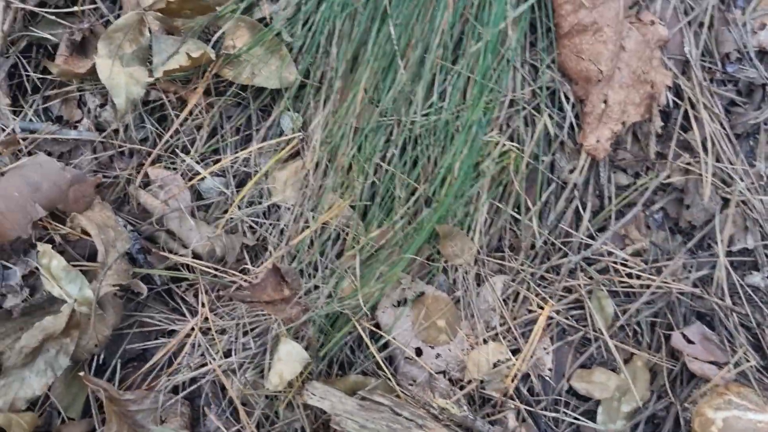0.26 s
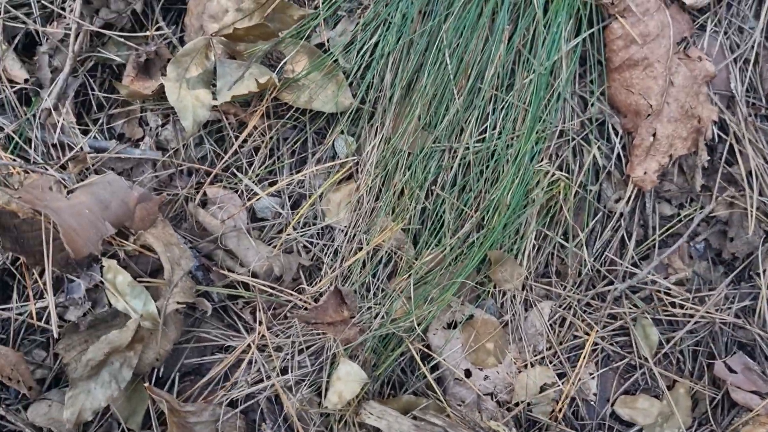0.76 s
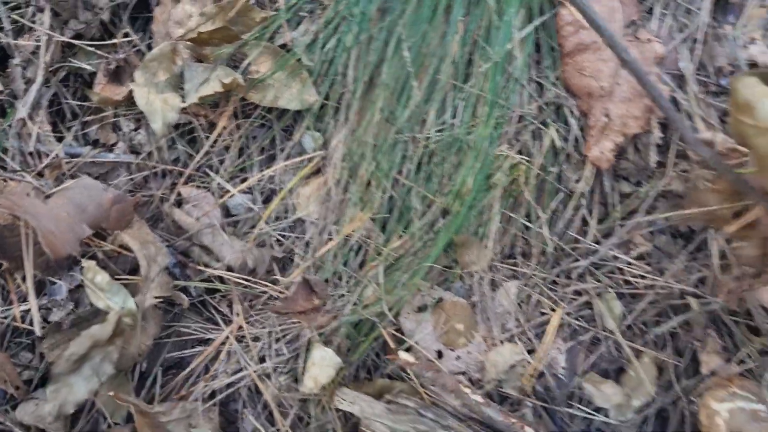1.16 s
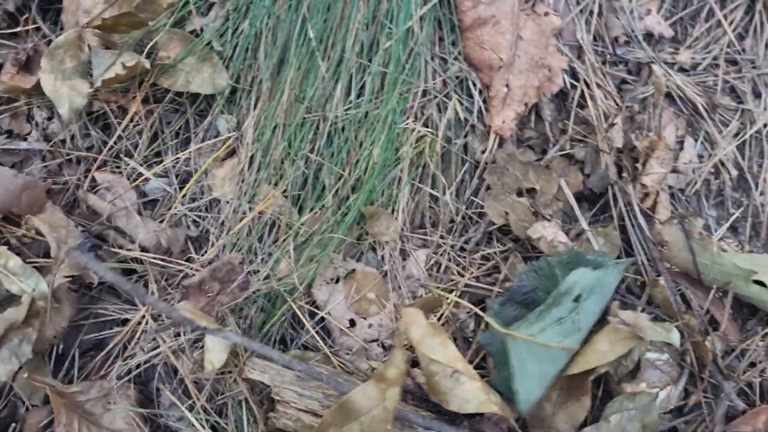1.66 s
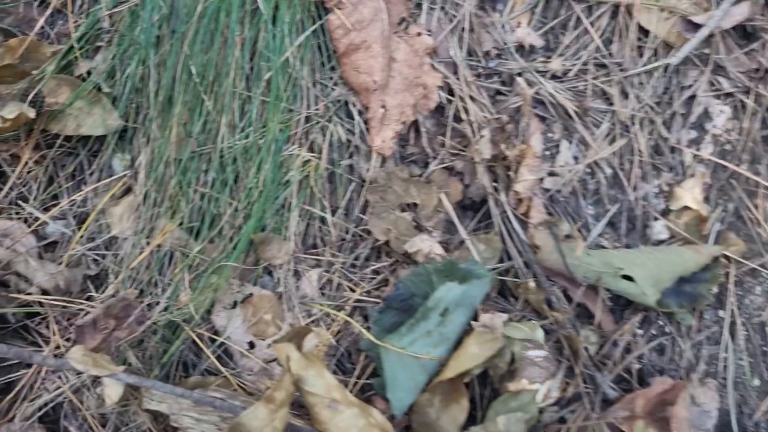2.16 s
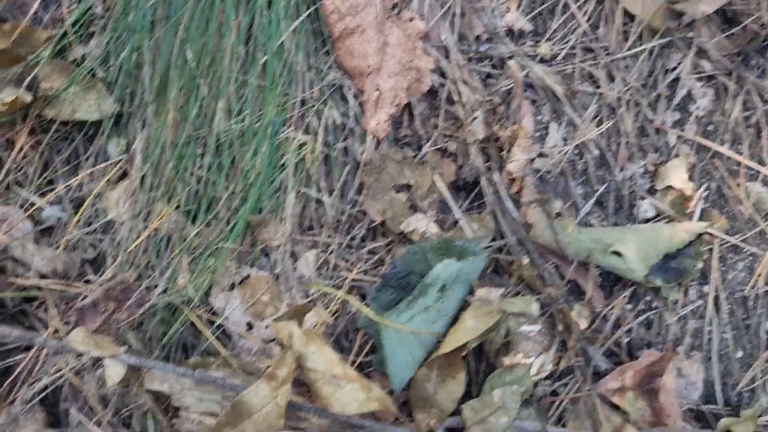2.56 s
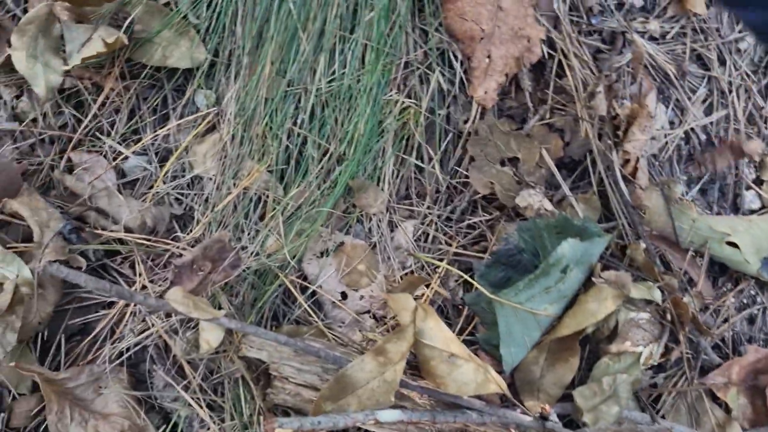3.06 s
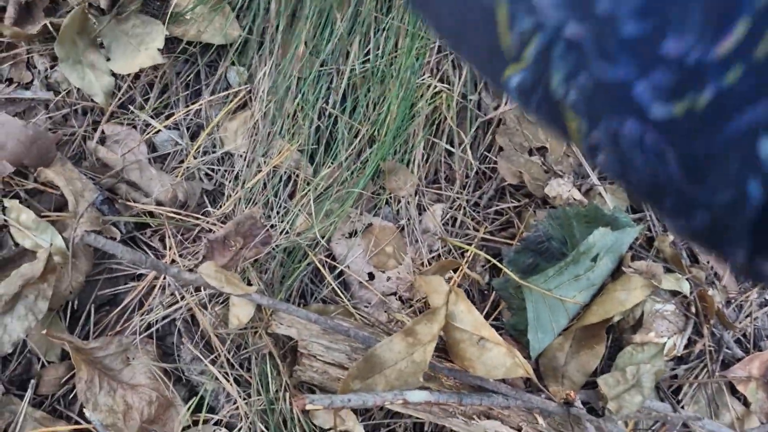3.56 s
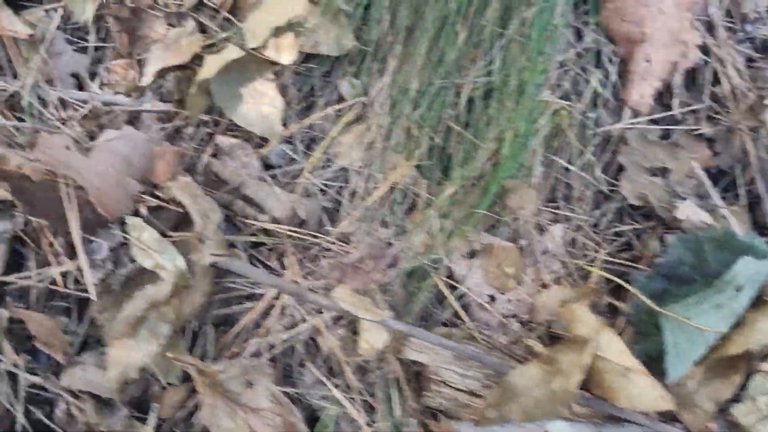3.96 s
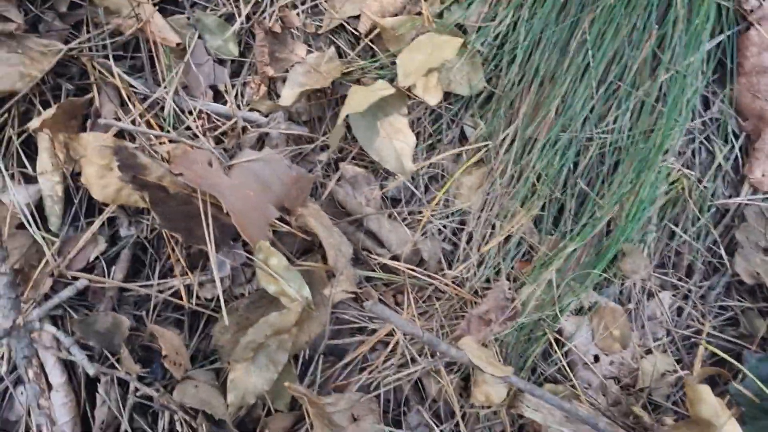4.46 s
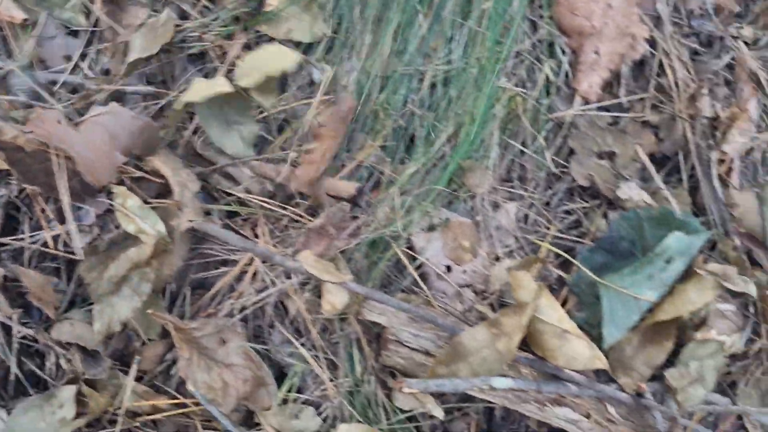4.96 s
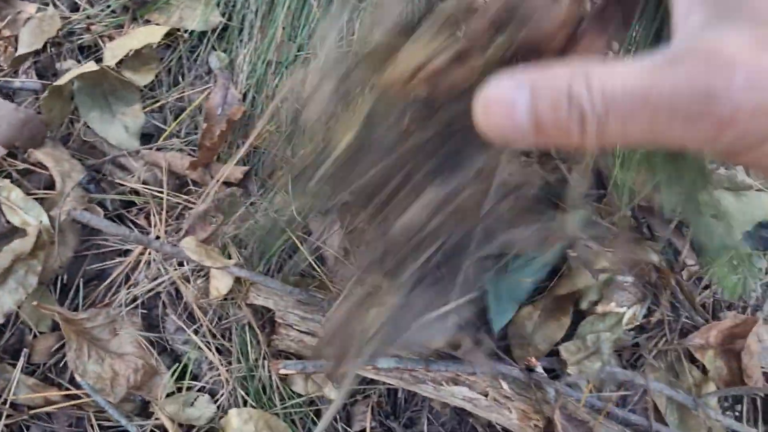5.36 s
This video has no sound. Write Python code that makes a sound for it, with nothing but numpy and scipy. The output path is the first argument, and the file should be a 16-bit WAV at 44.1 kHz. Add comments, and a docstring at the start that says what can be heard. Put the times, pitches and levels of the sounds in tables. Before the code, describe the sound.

Close, wide stereo sound from a forest floor, dry and without reverberation. From 0 to 0.7 s a hand rustles crisp leaves and pine needles in short strokes, with bright tiny snaps around 0.2-0.4 s. The strongest grab comes at 0.93-0.96 s: a dense burst of sharp cracks with a dull soft pat on soil. Weaker rustles follow near 1.1 and 1.5 s, then it is mostly quiet until about 2.3 s, with sparse ticks. From 2.6 to 4 s fuller papery rustling swells and overlaps, with snaps at 2.8 and 3.2 s and a dull woolly sleeve brush around 3.2 and 4 s. Another scuff and crumple comes at 4.3 s, a tick and low thump on the recorder at 4.5 s, fainter bumps near 4.85 s, then light crackles to 5.6 s. Underneath: soft airy rumble, thin steady insect buzz around 8 kHz, and a faint far engine drone fading away.

```python
"""A hand rakes and lifts dry leaves and pine needles on a forest floor, close to a stereo microphone.
The litter crackles in random clicks and band-filtered noise; needles and stalks snap as short ringing bursts.
A sleeve brushes by as dull filtered noise, and the recorder is bumped with ticks and low thumps.
Insects buzz as fluttering bands of noise, far off an engine drones in sine waves and fades,
and noise shaped band by band makes the soft air of the forest."""
import sys
import numpy as np
from scipy import signal
from scipy.io import wavfile
from scipy.ndimage import map_coordinates

SR = 44100
rng = np.random.default_rng(int(sys.argv[2]) if len(sys.argv) > 2 else 0)


def wav_record(signal):
    """Record a signal, one row per channel, as 16-bit PCM in the file named by sys.argv[1]."""
    frames = np.transpose(np.atleast_2d(signal))
    bounded = np.clip(frames, -1, 1)
    # unit amplitude maps onto the largest positive 16-bit level
    quanta = np.round(bounded * 32767).astype(np.int16)
    wavfile.write(sys.argv[1], SR, quanta)


N = 247834  # length [samples]

# forest air: (frequency [Hz], relative level per Hz [dB])
AIR_COLOUR = [(25, -14), (45, -22), (70, 12.5), (110, -6.5), (170, -11), (260, -7), (400, -5), (700, -3),
              (1200, -6), (2000, -15.5), (4000, -21.5), (7000, -29), (11000, -14), (16000, -26)]
# likeness of forest air at the two ports: (frequency [Hz], likeness [-1 to 1])
AIR_LIKENESS = [(60, 0.61), (130, 1), (300, 0.13), (700, -0.71), (1400, -0.83), (4000, 0.045)]
# far engine: (time [s], cycle rate [Hz], level [dB])
ENGINE_COURSE = [(0, 13.7, -56), (1.1, 15.2, -56), (1.9, 14.5, -56), (2.4, 13.8, -57), (3.5, 12, -58.5),
                 (5, 13, -60.5), (5.62, 18, -88)]
# tones of the engine: (multiple of the cycle rate [-], relative level [dB])
ENGINE_ORDERS = [(4, -1.5), (6, -6), (10, -10), (12, -30)]
# steady far drone: (time [s], frequency [Hz], level [dB])
DRONE_COURSE = [(0, 72, -55), (.6, 74, -56), (2.4, 72, -57), (3, 74, -60.5), (3.9, 75.5, -58),
                (4.8, 73, -65), (5.62, 75, -64)]
# insect chorus: (centre [Hz], width [Hz], level [dB])
INSECT_BANDS = [(7550, 1100, -53), (8160, 370, -52.5), (8760, 300, -53.5)]
# knocks on the recorder's case: (time [s], tick level before trim [dB], thump level before trim [dB])
CASE_BUMPS = [(4.5144, -25.5, -29.5), (4.835, -39, -58), (4.895, -52, -39)]
# a knitted sleeve brushes past: (time [s], hold [s], level [dB], rise [s], fall [s], centre [Hz])
SLEEVE_BRUSHES = [(3.25, 0.18, -48.5, .5, 0.35, 857), (3.95, 0.13, -49.5, 0.17, .1, 756),
                  (4.26, 0.057, -45, 0.21, 0.12, 595), (4.9, 0.066, -53.5, 0.15, 0.31, 570)]
# where the hand works: (time [s], lag of the left port [ms])
HAND_PLACE = [(0, 0.51), (.95, 0.46), (1.2, .27), (2.6, 0.31), (3.9, -.12), (5.3, 0.41), (5.62, 0.039)]
# strokes of the hand through the litter: (time [s], hold [s], relative crackle level [dB], rise [s],
# fall [s], crisp treble lift [dB], hollow low lift [dB], ring of pressed leaves [Hz], left over right [dB])
HAND_STROKES = [(0.05, 0.28, -41.5, 0.12, 0.0054, 2, 2.5, 3020, 0),
                (0.2, 0.088, -34.5, 0.032, 0.0081, 2, 3, 3370, 0.5),
                (0.47, 0.24, -44.5, 0.1, 0.054, 1.5, -1, 5060, -4),
                (0.615, 0.015, -32.5, 0.012, 0.017, 9.5, 3, 5000, 1.5),
                (0.84, 0.1, -41.5, 0.048, .02, 0, 1.5, 3780, -5),
                (0.929, .037, -25.5, 0.0029, 0.013, 2, -3.5, 4800, -4.5),
                (0.98, .03, -37.5, .01, 0.11, 7.5, 3.5, 4450, 0),
                (1.09, 0.057, -45.5, 0.04, 0.053, -4, 15, 5030, 0),
                (1.42, 0.0092, -42.5, 0.04, 0.034, 4, -5, 3500, -4.5),
                (1.505, 0.049, -37.5, 0.021, 0.07, -1, 0, 3300, -3),
                (1.795, .01, -51, 0.041, .025, 3.5, -14, 3300, -1),
                (2.335, .08, -47, 0.043, 0.077, 5.5, -8, 2940, -2.5),
                (2.64, 0.27, -40.5, 0.049, 0.044, 7, -5.5, 3600, -4),
                (2.94, 0.26, -39.5, .02, 0.054, 0, -3, 3386, -2.5),
                (3.22, 0.11, -36.5, .02, 0.095, -1.5, -1, 3480, -2.5),
                (3.4, 0.11, -34, 0.2, 0.068, 1.5, 3.5, 3840, -3),
                (3.68, 0.093, -36, 0.16, 0.092, 2, 2, 6400, -1),
                (3.885, 0.088, -32, 0.067, 0.17, 1, 3, 6930, 0.5),
                (4.31, 0.24, -37, 0.053, 0.074, -3, 0.5, 2980, -3),
                (4.675, 0.01, -36.5, 0.017, 0.045, 0, -2, 4540, -1.5),
                (4.78, 0.14, -46.5, 0.069, 0.065, -2.5, 3.5, 3800, -2),
                (4.97, 0.19, -42.5, 0.075, 0.14, 4, -3.5, 3870, -3.5),
                (5.4, 0.066, -40.5, 0.059, 0.036, 1.5, -6, 3300, -4.5),
                (5.512, 0.047, -34.5, 0.02, 0.071, 4.5, 1, 3970, -2.5)]
# colour of the dry litter: (frequency [Hz], relative level per Hz [dB])
LITTER_COLOUR = [(250, -11), (500, -19), (750, -9.5), (1050, -2.5), (1600, -8), (2200, -3.5), (3200, -2),
                 (6000, -1), (7300, -4), (9000, -0.5), (11000, -2), (12600, 0.5), (14500, -0.5),
                 (16000, -6)]
# likeness of the two ports for sound scattered by the ground: (frequency [Hz], likeness [-1 to 1])
SCATTER_LIKENESS = [(250, 0.97), (700, -0.036), (1400, -0.57), (3000, -0.38), (7000, 0.15), (16000, -0.047)]
# loud snaps of needles and stalks: (time [s], level [dB], ring [Hz], left over right [dB], decay [s])
LOUD_SNAPS = [(0.1907, -25, 14500, -13, 0.0018), (0.2609, -20.5, 12800, 5, 0.0026),
              (0.307, -21.5, 13900, 0, 0.0036), (0.381, -33, 2800, -3, 0.0019),
              (0.627, -30, 10900, 10, .002), (0.8156, -34, 12600, 3, .002),
              (0.8308, -30.5, 12900, -2, .0018), (0.8605, -26, 14600, -12, 0.0057),
              (0.927, -22, 4080, -13, 0.0023), (0.948, -15.5, 13000, -7, 0.0023),
              (0.9605, -17, 13000, -13, .002), (1.0954, -31, 2000, -7, 0.0026),
              (1.1323, -29.5, 12600, 8, 0.0082), (1.2197, -29.5, 9700, 3, 0.006),
              (1.2803, -38, 5150, -4, .0022), (1.5008, -34, 4340, 6, .0015), (1.6673, -37, 8600, 2, .0018),
              (1.973, -49, 4570, 0, 0.0024), (2.2976, -33, 8550, -7, .0018),
              (2.334, -37, 11800, -10, 0.0018), (2.3455, -26.5, 10100, -5, .0025),
              (2.402, -35.5, 3100, -12, .003), (2.4597, -31.5, 8300, -9, 0.0013),
              (2.4813, -32, 13320, -10, 0.0013), (2.8341, -24.5, 12400, -6, 0.002),
              (2.946, -25.5, 4460, -10, .003), (3.198, -21, 11900, 0, 0.0047),
              (4.3007, -30.5, 12500, 2, .0023), (4.344, -32, 7700, -14, 0.0014),
              (4.3808, -29.5, 2220, -4, 0.0022), (4.872, -36.5, 3420, 0, 0.0098),
              (4.9184, -36, 3800, -2, 0.0013), (4.966, -35, 4760, -2, 0.0076),
              (5.2631, -31, 11400, -6, .002), (5.3405, -30.5, 8500, -2, .0015),
              (5.4004, -27.5, 11800, -15, .0022), (5.432, -32, 3400, 6, 0.0023)]
# near reflections from the hand and the ground: (middle delay [ms], relative level [dB])
NEAR_ECHOES = [(1.5, -14.5), (3.6, -15.5), (7.0, -13.5)]
# papery body of the leaf pile: (centre [Hz], width [Hz], lift [dB])
PILE_BODY = [(976, 240, 3), (1656, 270, 6.5), (12800, 630, 2.5)]
# dips where the recorder's case shades the left port: (centre [Hz], width [Hz], change [dB])
LEFT_SHADE = [(1315, 110, -23.5), (2330, 440, -10.5)]
# dips where the case shades the right port: (centre [Hz], width [Hz], change [dB])
RIGHT_SHADE = [(1250, 920, -4), (2100, 230, -3.5)]

SCATTER_S, SNAP_TAIL_S = .003, .011
# every movement leaves a weaker, slower settling, above a floor that never falls quite still
SETTLE_DB, SETTLE_S, STILL_DB = -15.5, 0.15, -68.5
CUTOFF_HZ = 15950


def from_db(db):
    """Turn decibels into gain."""
    return 10 ** (np.asarray(db) / 20)


def rms_one(x):
    """Scale to an rms (average strength) of 1."""
    return x / np.sqrt(np.mean(x ** 2) + 1e-20)


def in_time(rows):
    """Read each column of a timed table at every sample."""
    s, *columns = np.transpose(rows)
    return [np.interp(np.arange(N) / SR, s, column) for column in columns]


def at_hz(points, hz):
    """Read a curve between its points on a log-frequency axis."""
    f, value = np.transpose(points)
    return np.interp(np.log(hz), np.log(f), value)


def band(x, low, high, order=2):
    """Keep the sound between two frequencies with a Butterworth filter."""
    sos = signal.butter(order, [low, min(high, .47 * SR)], "band", fs=SR, output="sos")
    return signal.sosfilt(sos, x + 1e-18)


def drift(rate):
    """Wander in straight lines between random values (spread 1) drawn rate times a second."""
    knots = rng.standard_normal(4000)
    return np.interp(np.arange(N) / SR * rate, np.arange(len(knots)), knots)


def two_ports(pair, likeness):
    """Mix two unrelated signals into a left and right that are alike by a given amount."""
    c = np.clip(likeness, -.98, .98)
    shared = np.sqrt(1 + c) * pair[0]
    opposed = np.sqrt(1 - c) * pair[1] * np.array([[1], [-1]])
    return (shared + opposed) / np.sqrt(2)


def panned(pan_db):
    """Left and right gains at constant power; a positive setting favours the left."""
    gains = from_db(np.array([pan_db, -pan_db]).reshape(2, -1) / 2)
    return gains / np.sqrt(np.mean(gains ** 2, axis=0))


def add(out, s, sound):
    """Mix a short sound in at a time in seconds."""
    i = int(s * SR)
    out[:, i:i + sound.shape[-1]] += sound[..., :max(N - i, 0)]


def delayed(x, ms):
    """Read a signal late by a delay that may move."""
    return map_coordinates(x, [np.arange(N) - ms * SR / 1000], order=3)


def resonance(x, hz, width, size=256):
    """Ring at a pitch that may move: a two-pole resonator with a peak gain near 1."""
    hz, r = np.broadcast_to(hz, N), np.exp(-np.pi * width / SR)
    out, state = np.zeros_like(x), np.zeros((2, 2))
    # the pitch is renewed once per block of samples
    for i in range(0, N, size):
        poles = [1, -2 * r * np.cos(2 * np.pi * hz[i] / SR), r * r]
        out[:, i:i + size], state = signal.lfilter([1, 0, -1], poles, x[:, i:i + size], zi=state)
    return out * (1 - r * r) / 2


def coloured(x, peaks):
    """Lift or dip bands by adding or taking away a filtered copy."""
    for hz, width, db in peaks:
        filtered = signal.lfilter(*signal.iirpeak(hz, hz / width, fs=SR), x)
        x = x + (from_db(db) - 1) * filtered
    return x


def movements(rows):
    """Swell, hold, fade and settle each movement; give the total level [dB] and power-weighted qualities."""
    t, power, blend = np.arange(0, N, 32) / SR, 1e-20, 0
    for s, hold_s, db, rise_s, fall_s, *qualities in rows:
        before, after = np.maximum(s - t, 0), np.maximum(t - s - hold_s, 0)
        settling = from_db(SETTLE_DB) * np.exp(-after / SETTLE_S)
        release = np.maximum(np.exp(-after / fall_s), settling)
        own = (from_db(db) * np.exp(-before / rise_s) * release) ** 2
        power, blend = power + own, blend + np.outer(qualities, own)
    level_db = 10 * np.log10(power + from_db(STILL_DB) ** 2)
    return in_time(np.column_stack([t, level_db, *(blend / power)]))


def air(level_db=-53.0, patchy_db=3.0):
    """The soft rumble and hush of the open forest: noise bands that wander in level."""
    out, white = 0, rng.standard_normal((2, 2, N))
    edges = np.geomspace(22, 17000, 18)
    for k, (low, high) in enumerate(zip(edges, edges[1:])):
        hz = np.sqrt(low * high)
        gain = from_db(at_hz(AIR_COLOUR, hz) + patchy_db * drift(7.5))
        out = out + gain * two_ports(band(white[k % 2], low, high), at_hz(AIR_LIKENESS, hz))
    return from_db(level_db) * rms_one(out)


def engine(waver_db=2.5, low_cut_hz=47, rumble_db=-3.5):
    """Only rumble and multiples of a far engine's cycle rate carry through the trees, beside a drone."""
    rate, level_db = in_time(ENGINE_COURSE)
    turn = 2 * np.pi * np.cumsum(rate) / SR
    orders = 0
    for multiple, db in ENGINE_ORDERS:
        tone = np.sin(round(multiple) * turn + rng.uniform(0, 2 * np.pi))
        orders = orders + from_db(db + waver_db * drift(5.16)) * tone
    rumble_noise = band(two_ports(rng.standard_normal((2, N)), 0.58), 100, 274)
    rumble = from_db(rumble_db) * rms_one(rumble_noise)
    hz, drone_db = in_time(DRONE_COURSE)
    drone = from_db(drone_db + waver_db * drift(5.8)) * np.sin(2 * np.pi * np.cumsum(hz) / SR)
    tones = band(from_db(level_db) * orders + drone, low_cut_hz, 550, order=4)
    # the root of 2 brings a sine wave to an rms of 1
    return np.sqrt(2) * tones + from_db(level_db) * rumble


def insects(pulse_hz=100, flutter_db=2.8, level_db=0.0):
    """Insects high in the trees merge into a buzz: overlapping noise bands with a fast random flutter."""
    out = 0
    for hz, width, db in INSECT_BANDS:
        rasp = rng.standard_normal((2, N)) * from_db(flutter_db * drift(pulse_hz))
        voice = band(rasp, hz - width / 2, hz + width / 2, order=1)
        out = out + from_db(db + level_db) * rms_one(band(voice, 7200, 10200))
    return out


def bumps(thump_hz=64, swell_s=0.023, tick_s=0.0016, tick_top_hz=3200, pan_db=-7):
    """A finger ticks on the case, which then wobbles in the grip: a noise burst and a swelling sine."""
    out, t = np.zeros((2, N)), np.arange(SR // 3) / SR
    swell = (t / swell_s) ** 2 * np.exp(2 - 2 * t / swell_s)
    wobble = swell * np.sin(2 * np.pi * thump_hz * t)
    for s, tick_db, thump_db in CASE_BUMPS:
        tick = band(rng.standard_normal(len(t)) * np.exp(-t / tick_s), 210, tick_top_hz)
        tick = from_db(tick_db + 7) * tick / np.abs(tick).max()
        add(out, s, panned(pan_db) * (tick + from_db(thump_db - 4) * wobble))
    return out


def sleeve(width_hz=420, lumpy_db=1.0, likeness=0.21):
    """Wool catches and slides in dull, lumpy scuffs: noise through two resonators in a row."""
    db, hz = movements(SLEEVE_BRUSHES)
    rub = two_ports(rng.standard_normal((2, N)), likeness) * from_db(lumpy_db * drift(60))
    scuff = resonance(resonance(rub, hz, width_hz), hz, width_hz)
    return from_db(db) * rms_one(scuff)


def pat(s=.94, swell_s=0.032, level_db=-49, low_hz=110, high_hz=420):
    """The hardest grab presses through the leaves onto soft soil: a dull puff of low noise."""
    age = np.maximum(np.arange(N) / SR - s, 0) / swell_s
    puff = rms_one(band(two_ports(rng.standard_normal((2, N)), 0.61), low_hz, high_hz))
    return from_db(level_db) * age * np.exp(1 - age) * puff


def reflected(x, sway=0.0722, level_db=-0.69):
    """Short echoes comb the sound, differently at each port, and shift as the hand moves."""
    out = x.copy()
    for port in range(2):
        for ms, db in NEAR_ECHOES:
            out[port] += from_db(db) * delayed(x[port], ms * (1 + sway * drift(4)))
    return from_db(level_db) * out


def small_snaps(force_db, count=70, over_db=0.0, spread_db=7.0, strongest_db=-28,
                low_hz=3500, high_hz=14000, pan_db=-4, decay_s=0.0021):
    """List random breaks of thin needles, louder under more force, up to what a needle can bear."""
    rows = []
    for when, size, pitch in rng.random((count, 3)):
        db = force_db[int(when * N)] + over_db + spread_db * (2 * size - 1)
        hz = low_hz * (high_hz / low_hz) ** pitch
        rows.append((when * N / SR, min(db, strongest_db), hz, pan_db, decay_s))
    return rows


def snaps(rows, tail_db=-18, ring_db=0.0, ring_width=0.15, likeness=0.088, level_db=0.0, crack_low_hz=2000):
    """A snap is a broad crack, the ring of the broken piece and a short tail from the leaves around it."""
    out, t = np.zeros((2, N)), np.arange(SR // 16) / SR
    for s, db, hz, pan_db, decay_s in rows:
        decay = np.exp(-t / decay_s) + from_db(tail_db) * np.exp(-t / SNAP_TAIL_S)
        crack, ring = rng.choice([-1, 1], (2, 2, len(t))) * decay
        low, high = hz / (1 + ring_width), hz * (1 + ring_width)
        # a narrow band holds little of the noise, so it is lifted to match
        ring = band(ring, low, high, order=1) * np.sqrt(SR / np.pi / (high - low))
        # pieces that ring higher crack with less body
        crack = band(crack, crack_low_hz * np.sqrt(hz / 4000), 23000, order=1)
        sound = two_ports(crack + from_db(ring_db) * ring, likeness)
        add(out, s, from_db(db + level_db) * panned(pan_db) * sound)
    return out


def flicks(force_db, count=1100, ring_s=0.011, spread_db=3.5, level_db=-9.0):
    """Stiff needles and leaf edges spring free and ring briefly, each a fading sine at its own pitch."""
    out, t = np.zeros((2, N)), np.arange(SR // 16) / SR
    for when, pitch, size, side, left, right in rng.random((count, 6)):
        hz = 900 * 10 ** pitch
        start = np.array([[left], [right]])  # where in its cycle the tone begins at each port
        tone = np.sin(2 * np.pi * (hz * t + start)) * np.exp(-t / ring_s)
        db = force_db[int(when * N)] + level_db + spread_db * (2 * size - 1)
        add(out, when * N / SR, from_db(db) * panned(12 * side - 8) * tone)
    return out


def rustle(force_db, crisp_db, hollow_db, pan_db, per_s=1500, size_spread_db=3.0, colour_spread_db=6.5,
           direct_share=0.18, hiss_share=0.39, patchy_db=2.0, patches_per_s=22, level_db=0.0):
    """Leaves crack at random, faster under more force, heard directly and scattered by the litter."""
    lag_ms, = in_time(HAND_PLACE)
    # per_s cracks a second at a force of -40.5 dB
    chance = per_s * from_db(0.44 * (force_db + 40.5)) / SR
    at = np.flatnonzero(rng.random(N) < chance)
    sizes = rms_one(from_db(size_spread_db * np.clip(rng.standard_normal(N), -2, 2)))[at]
    # rarer cracks are made larger, so that force alone sets the loudness
    cracks = sizes / np.sqrt(chance[at]) * rng.choice([-1, 1], N)[at]
    # the surrounding leaves smear each crack over a few milliseconds
    fade = np.exp(-2 / (SCATTER_S * SR))
    white = rng.standard_normal((2, 2, N))
    edges = np.r_[np.geomspace(250, 2000, 9)[:-1], np.geomspace(2000, 16600, 18)]
    direct, scattered = 0, 0
    for k, (low, high) in enumerate(zip(edges, edges[1:])):
        hz = np.sqrt(low * high)
        # every fragment favours bands of its own
        favour = rms_one(from_db(colour_spread_db * rng.uniform(-0.97, 0.91, N)))
        clicks = np.zeros(N)
        clicks[at] = cracks * favour[at]
        energy = signal.lfilter([1 - fade], [1, -fade], clicks ** 2 + 1e-18)
        crisp_tilt = crisp_db * at_hz([(5500, 0.32), (11500, 1)], hz)
        hollow_tilt = hollow_db * at_hz([(1400, 1.0), (3200, 0.089)], hz)
        # the colour shifts as the fingers pass from leaf to leaf
        patches_db = patchy_db * drift(patches_per_s)
        gain = from_db(force_db + at_hz(LITTER_COLOUR, hz) + crisp_tilt + hollow_tilt + patches_db)
        # part of the noise follows the cracks, the rest is an even hiss
        loudness = np.sqrt(hiss_share + (1 - min(hiss_share, 1)) * energy)
        spray = two_ports(band(white[k % 2] * loudness, low, high), at_hz(SCATTER_LIKENESS, hz))
        # neighbouring bands of clicks alternate in sign
        direct = direct + gain * band(clicks, low, high) * (-1) ** k
        scattered = scattered + gain * spray
    direct = np.array([delayed(direct, lag_ms), direct])
    share = np.clip(direct_share, 0, 1)
    mixed = np.sqrt(share) * direct + np.sqrt(1 - share) * scattered
    return from_db(level_db + 6) * panned(pan_db) * mixed


def leaves(crumple_width_hz=900, crumple_db=2.0, jerk_db=1.25, jerks_per_s=45):
    """Fingers catch and slip, so the litter rustles and snaps; pressed leaves and the pile add a ring."""
    force_db, crisp_db, hollow_db, ring_hz, pan_db = movements(HAND_STROKES)
    force_db = force_db + jerk_db * drift(jerks_per_s)
    sound = reflected(rustle(force_db, crisp_db, hollow_db, pan_db) + flicks(force_db))
    crumple = (from_db(crumple_db) - 1) * resonance(sound, ring_hz, crumple_width_hz)
    sound = coloured(sound + crumple, PILE_BODY)
    return sound + snaps(list(LOUD_SNAPS) + small_snaps(force_db))


def scene(engine_pan_db=0.0):
    """The near litter, shaded by the case, in front of the far forest."""
    far = air() + panned(engine_pan_db) * engine() + insects()
    left, right = leaves()
    near = np.array([coloured(left, LEFT_SHADE), coloured(right, RIGHT_SHADE)])
    return far + bumps() + sleeve() + pat() + near


def record(dry):
    """The recorder cuts the highest treble steeply with an elliptic low-pass filter."""
    sos = signal.ellip(12, .1, 80, CUTOFF_HZ, fs=SR, output="sos")
    return signal.sosfilt(sos, dry)


dry = scene()
out = record(dry)
wav_record(out)
```